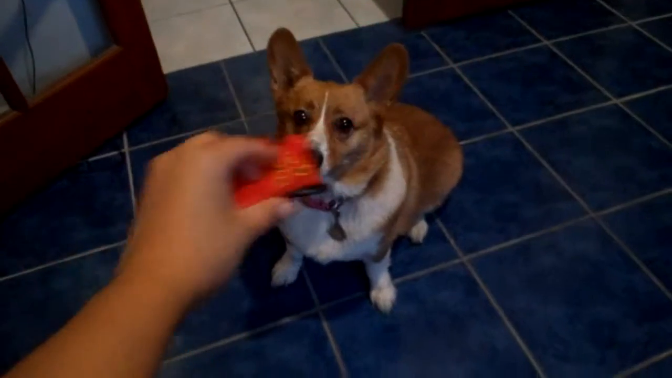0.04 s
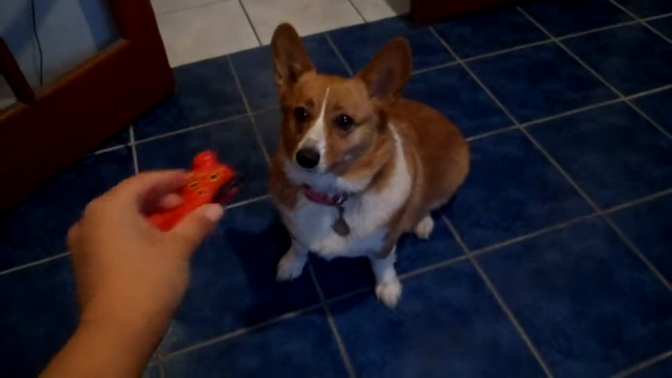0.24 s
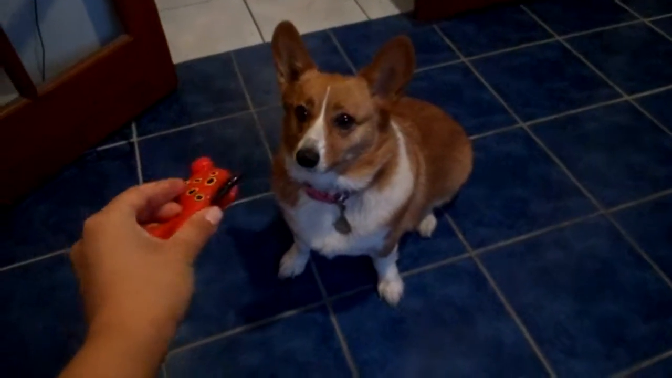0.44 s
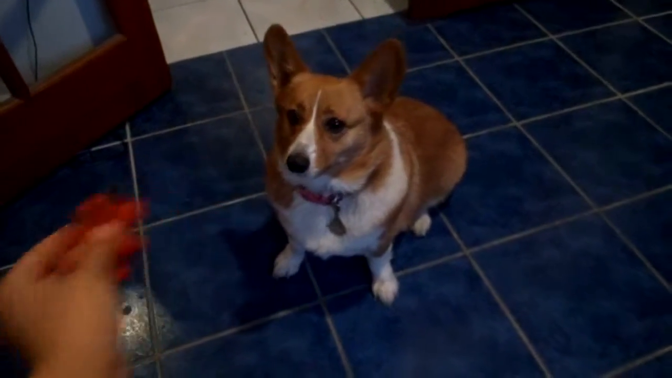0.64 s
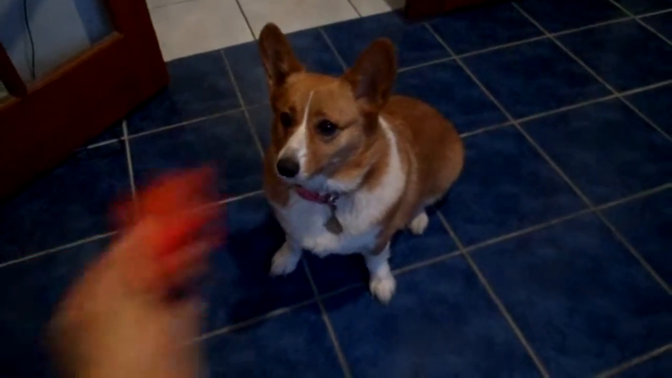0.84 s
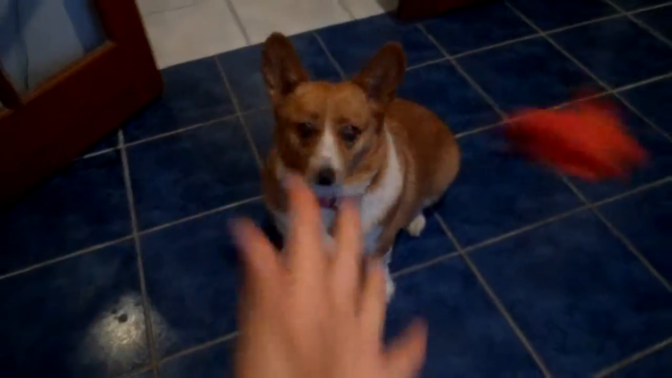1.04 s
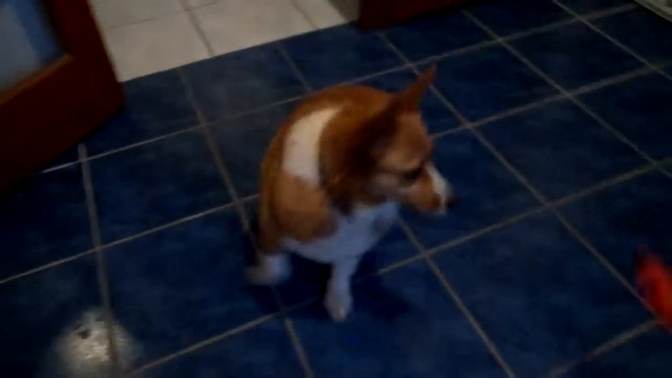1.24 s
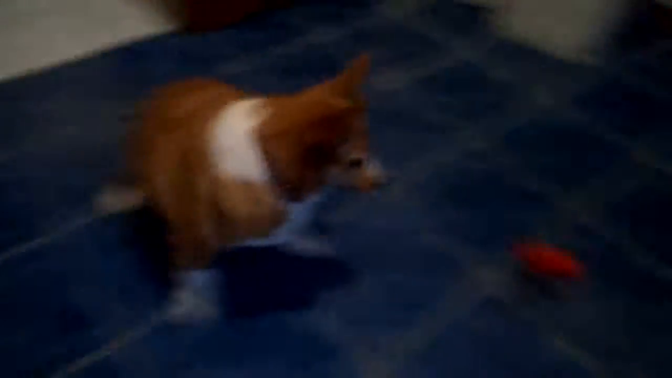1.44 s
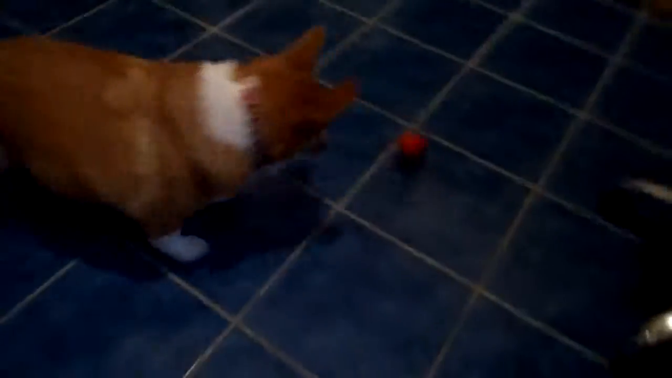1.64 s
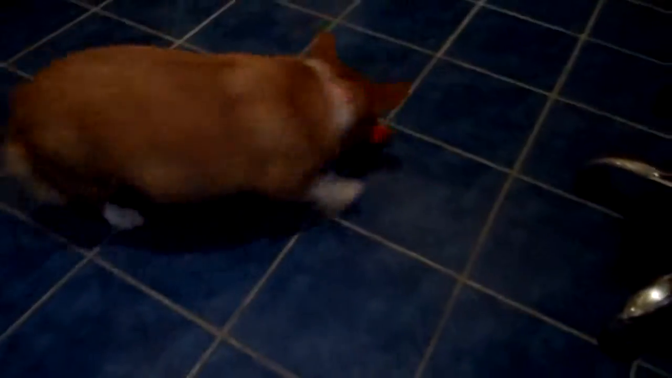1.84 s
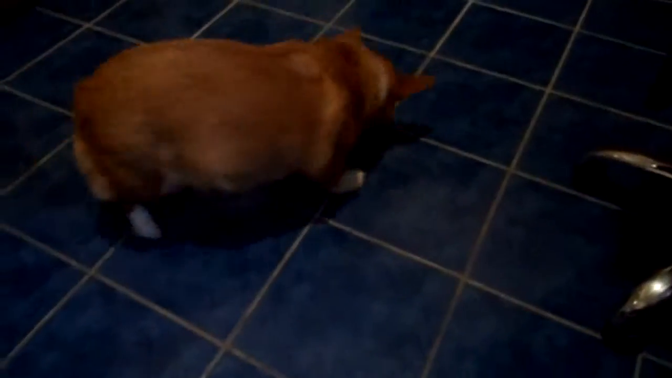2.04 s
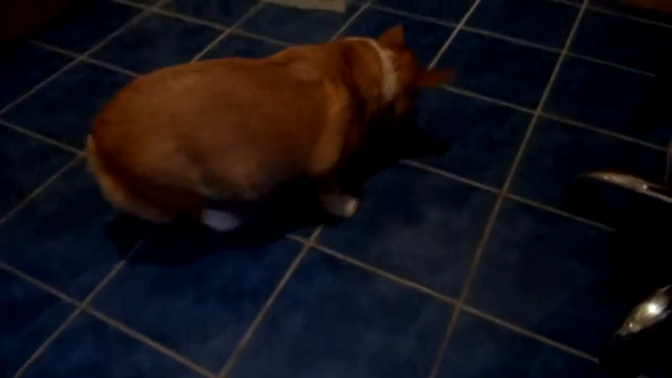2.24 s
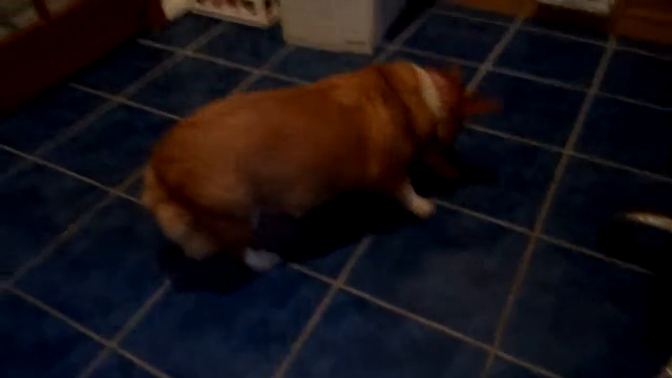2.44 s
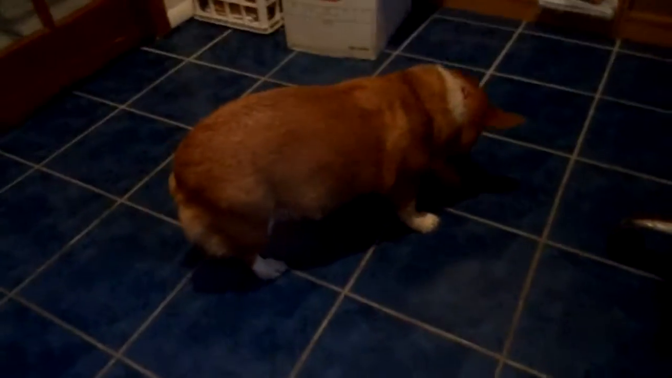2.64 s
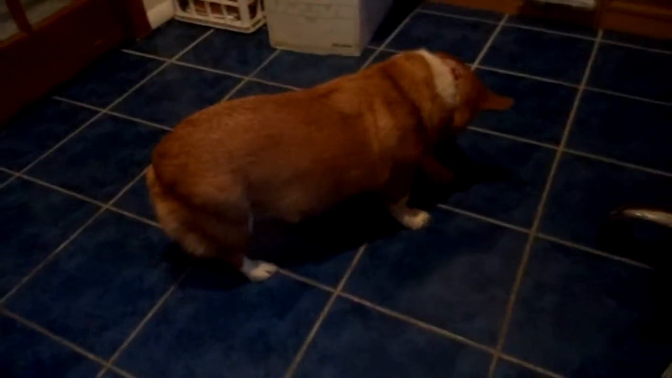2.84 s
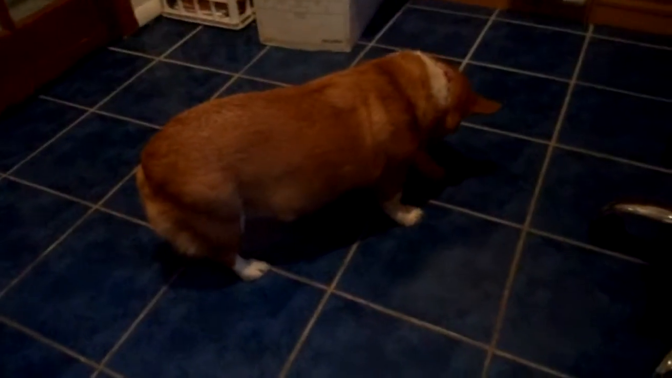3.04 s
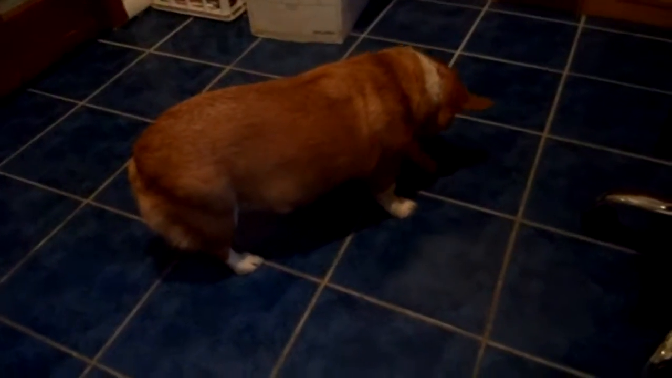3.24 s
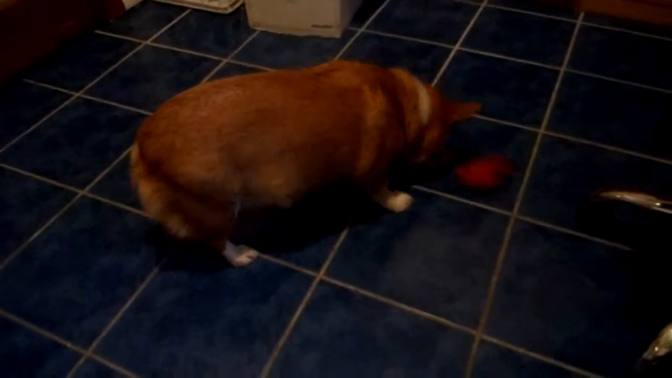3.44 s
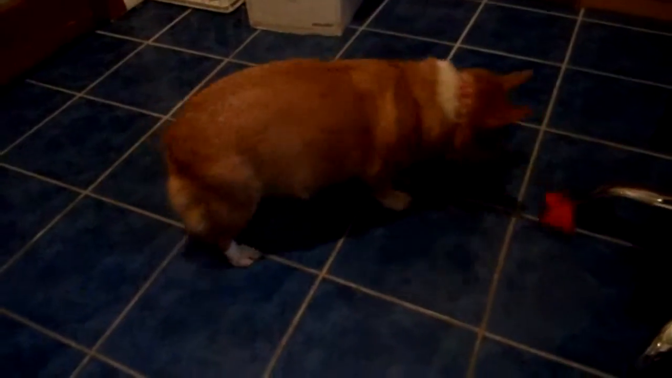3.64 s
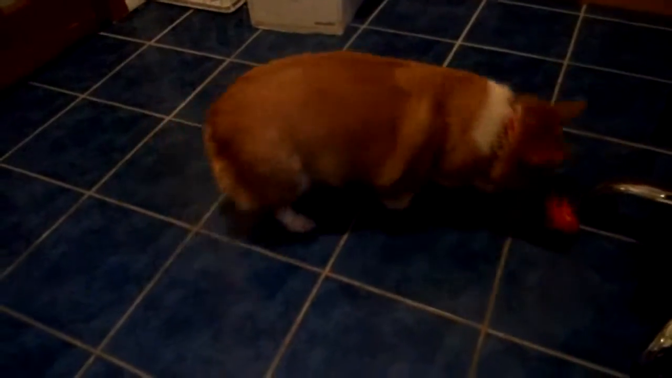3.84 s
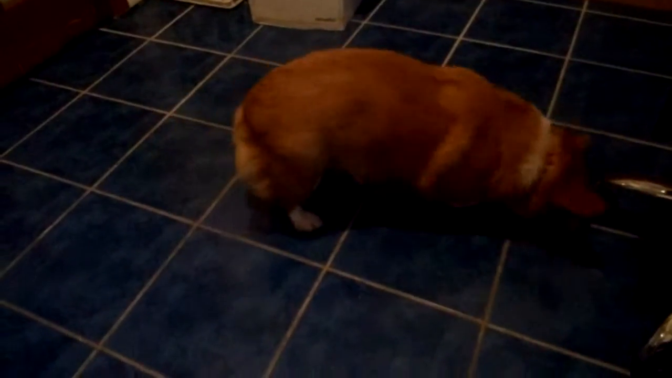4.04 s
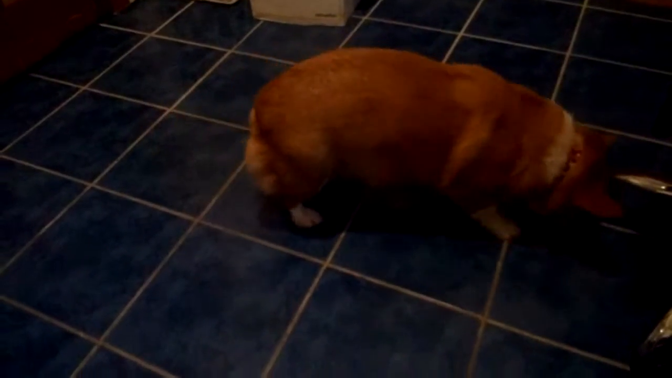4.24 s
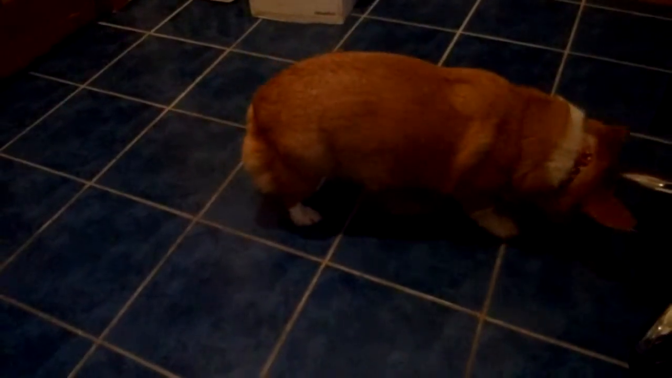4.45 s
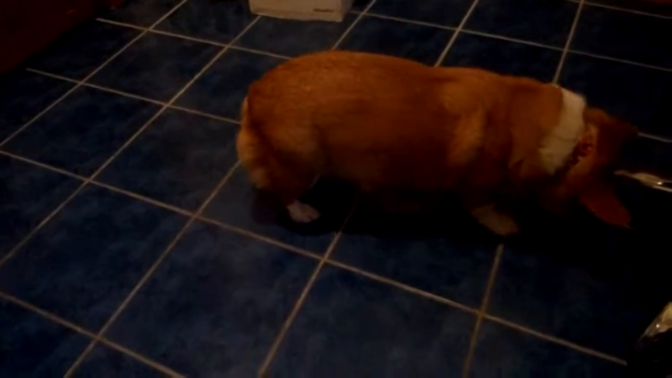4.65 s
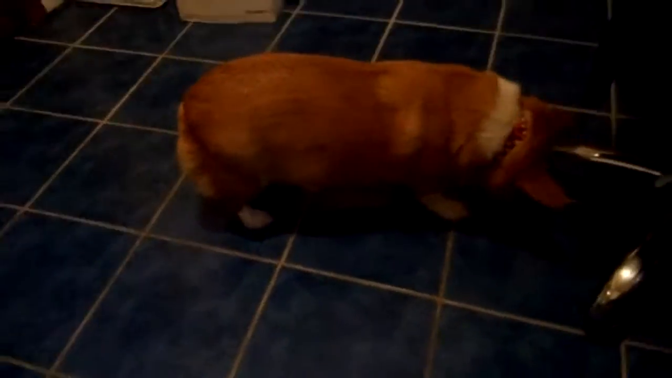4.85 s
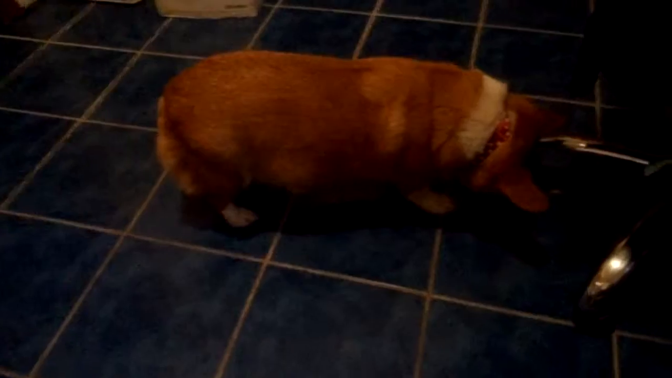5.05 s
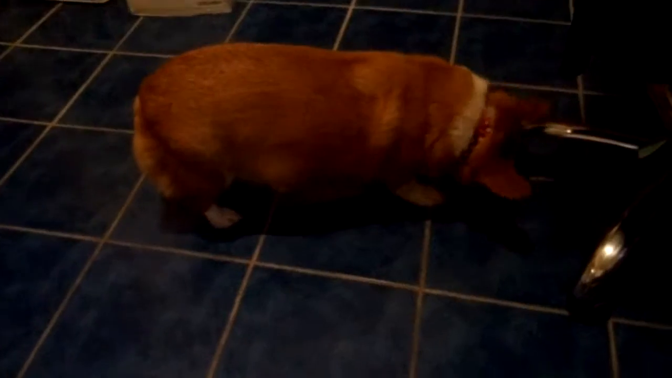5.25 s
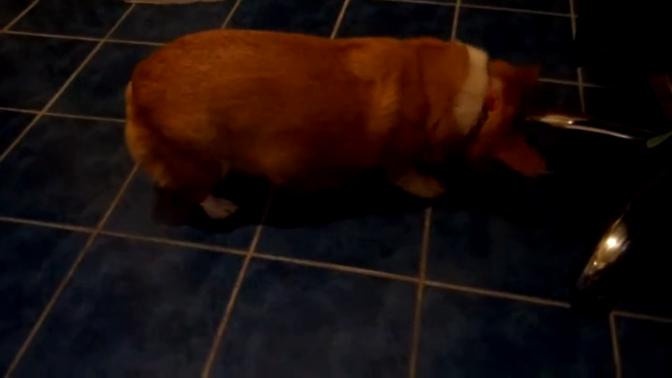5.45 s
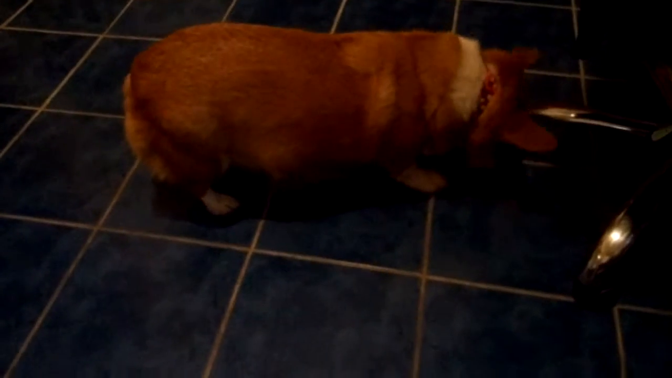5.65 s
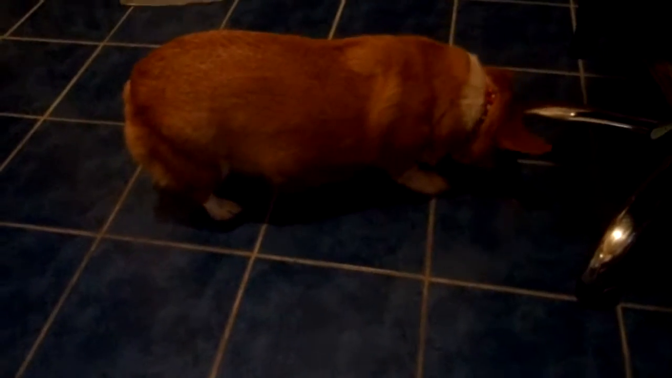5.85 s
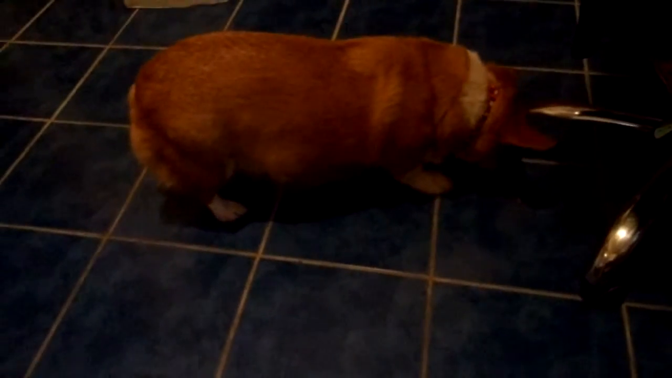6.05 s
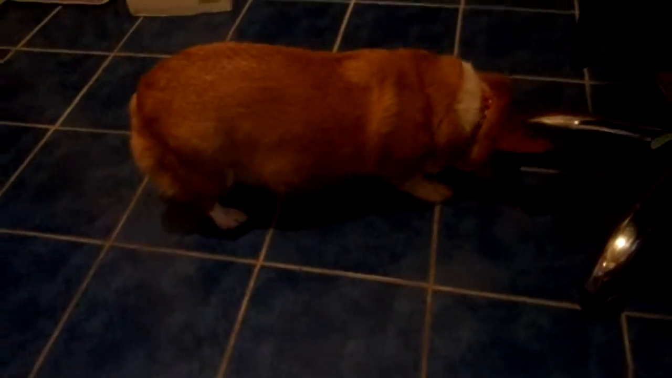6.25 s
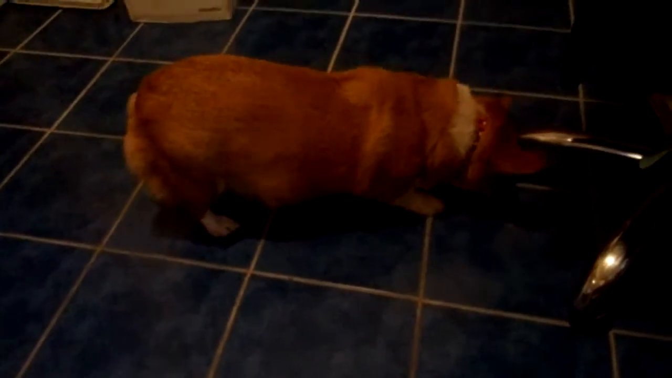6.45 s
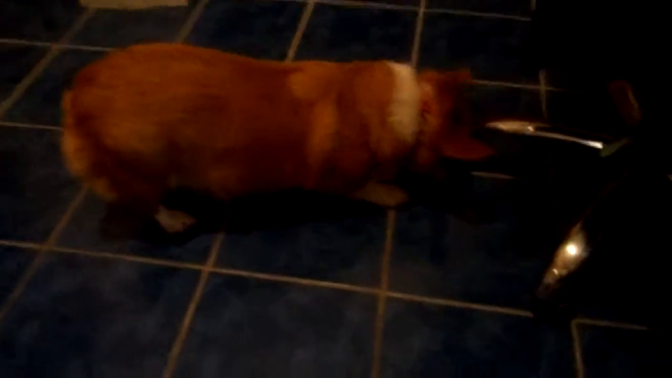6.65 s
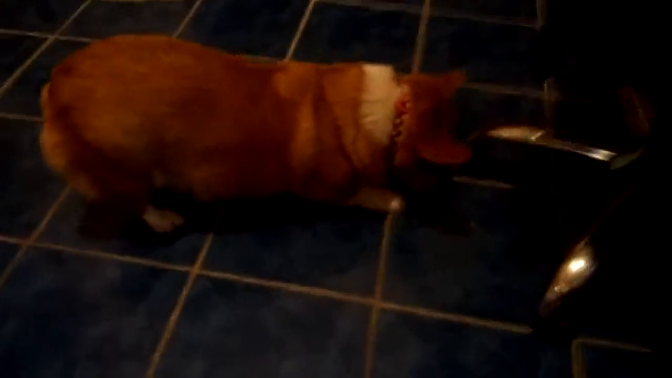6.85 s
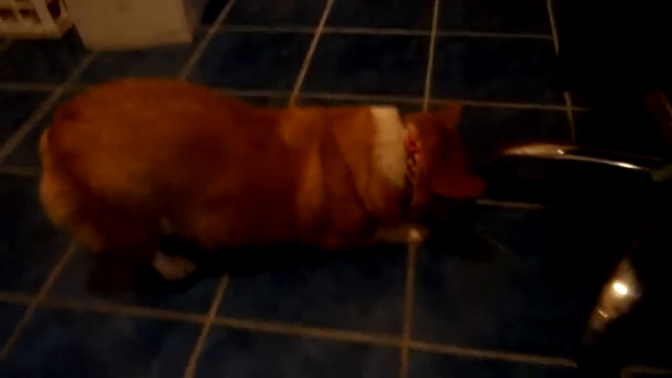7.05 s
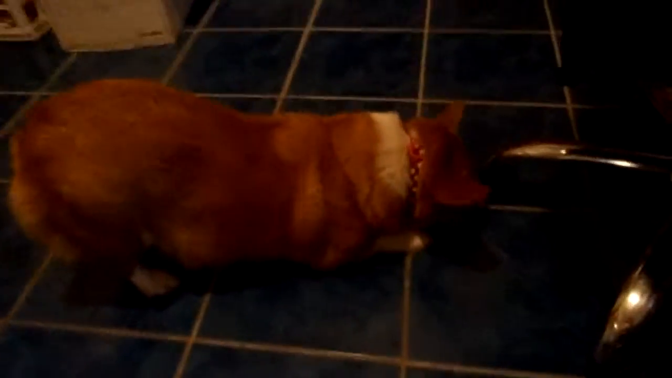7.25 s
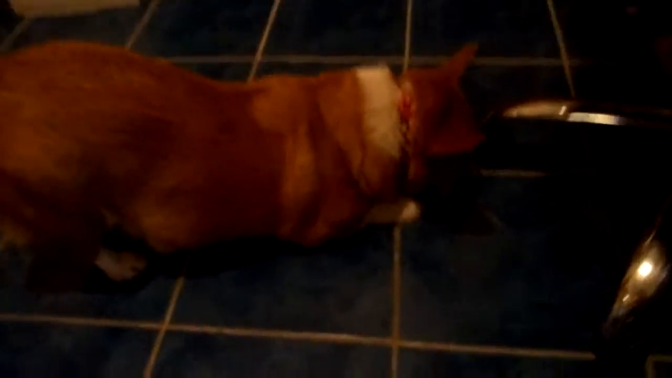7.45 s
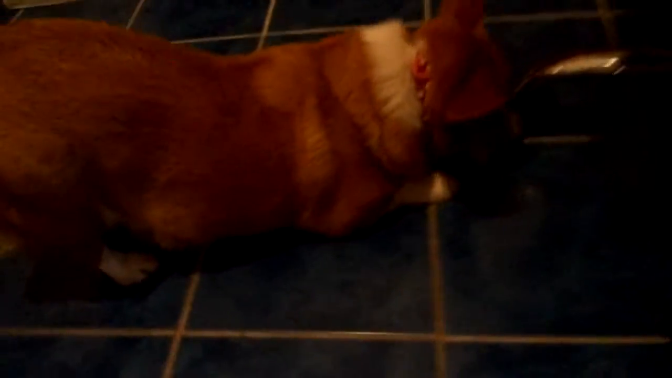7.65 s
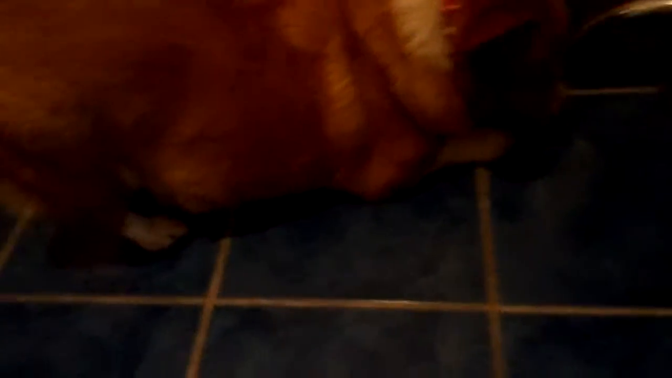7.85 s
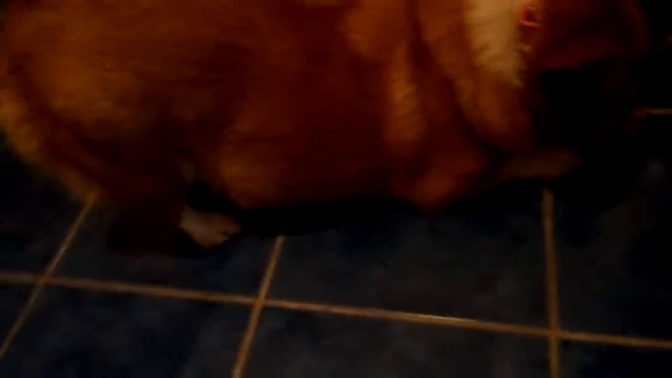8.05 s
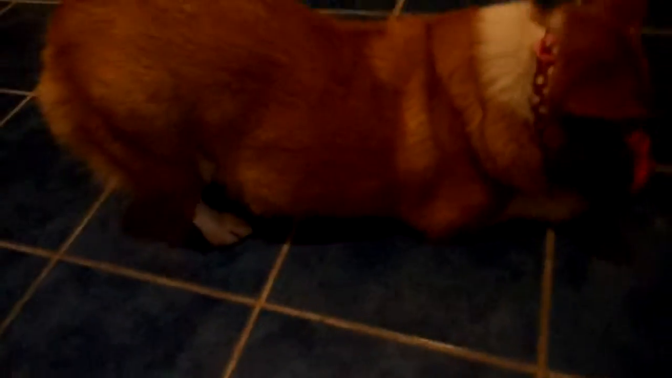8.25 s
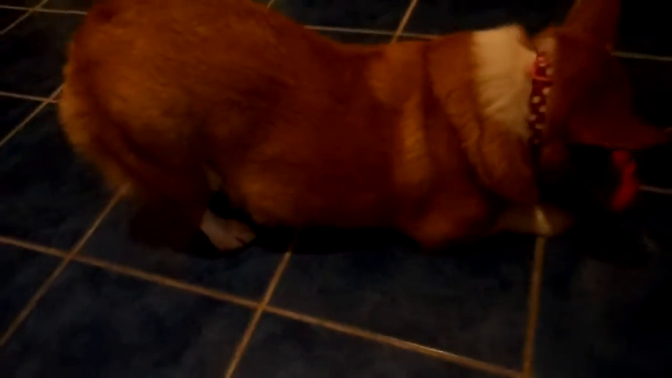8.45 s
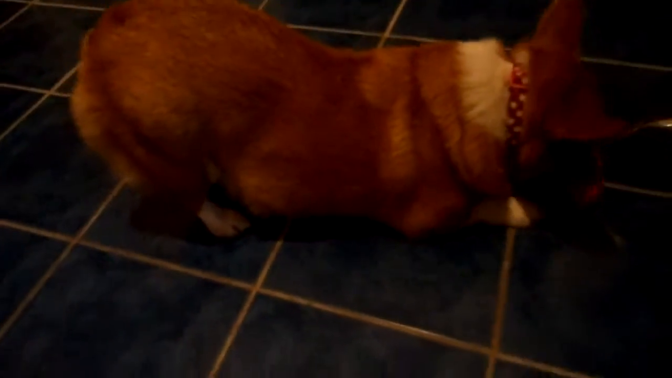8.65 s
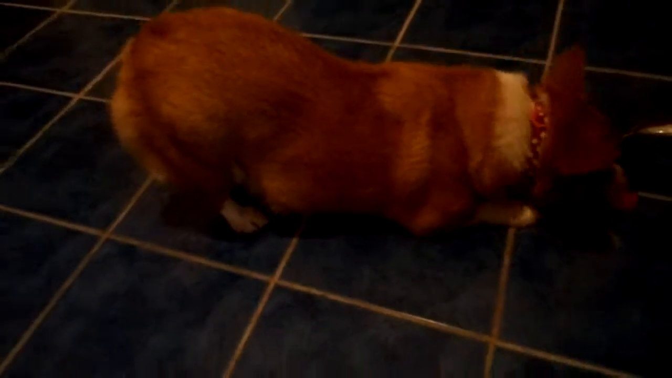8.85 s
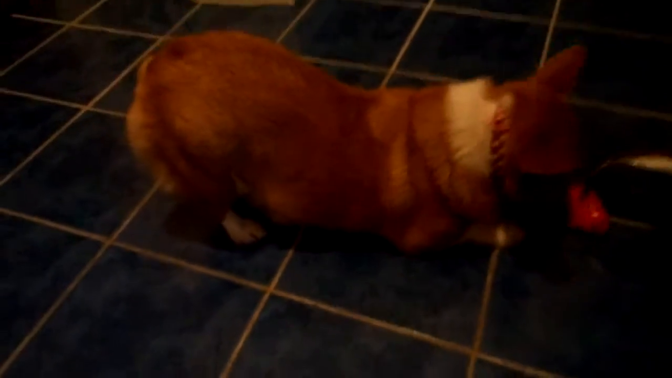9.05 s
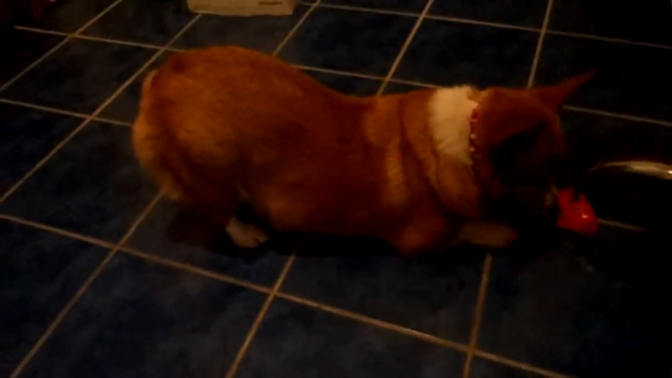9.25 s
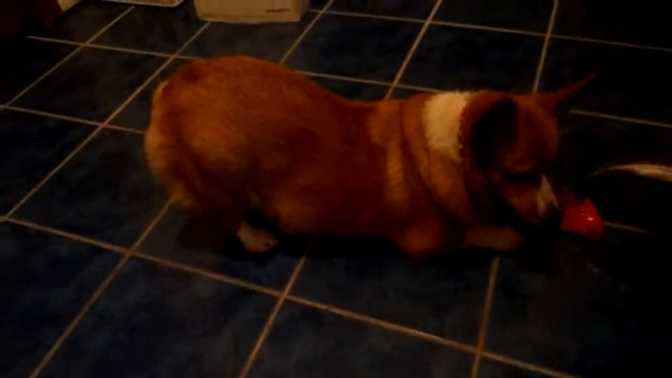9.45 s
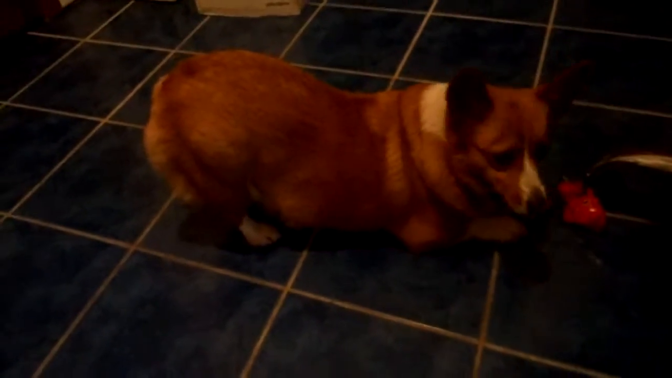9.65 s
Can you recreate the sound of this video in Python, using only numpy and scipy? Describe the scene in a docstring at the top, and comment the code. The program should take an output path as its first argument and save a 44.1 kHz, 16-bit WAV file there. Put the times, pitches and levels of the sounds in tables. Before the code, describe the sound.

A handheld stereo microphone near a dog on hard tile: quiet, then a toy landing, a flurry of sharp claw clicks and a bright tag ring. Claws, thumps and jingles return as the dog grabs the toy. Later comes a single abrupt, buzzy high squeak, faint hisses of squeezed air, a hollow snort, paw rubs and light thuds, all with short bright room reflections.

```python
"""A small, hard, tiled room indoors, on a two-port microphone: a dog chases, picks up and chews a rubber toy.
Claws, paws and toy meet the floor as short noise bursts; the collar tag jingles as a few decaying modes.
One hard bite drives the toy's reed as a sum of overtones; softer bites only press out puffs of shaped noise.
The dog huffs and snuffles as resonant noise, with one brief nose whistle.
Dense reflections answer the dog and toy; low rumble and faint hiss lie underneath."""
import sys
import numpy as np
from scipy import signal
from scipy.fft import rfft, irfft
from scipy.io import wavfile
from scipy.ndimage import uniform_filter1d

SR = 44100
rng = np.random.default_rng(int(sys.argv[2]) if len(sys.argv) > 2 else 0)


def store_wav(level_fs):
    """Save 16-bit WAV to argv[1]."""
    pcm = np.round(np.clip(np.atleast_2d(level_fs), -1, 1) * 32767)
    wavfile.write(sys.argv[1], SR, pcm.T.astype(np.int16))


N = 428451
HZ = np.fft.rfftfreq(N, 1 / SR)
EDGE_HZ = 14300  # upper band limit

# All table levels are relative: each source's own gain is added later.
# Rumble and hiss of the room: pitch_hz, level_db
ROOM_FLOOR_SPECTRUM = [(12, -21.5), (25, -4), (43, -9.5), (58, -6), (80, -15.5), (105, -8), (150, -16.5),
                       (236, -18.5), (270, -15.5), (310, -19), (468, -23.5), (615, -25.5), (1700, -34.5),
                       (3190, -35.5), (8790, -38), (14000, -37)]
# Likeness of the two microphone ports in the background: pitch_hz, likeness_0_to_1
FLOOR_LIKENESS = [(30, 0.88), (100, .75), (250, 0.52), (940, 0.37), (2350, 0.257), (14000, .03)]
# Rumble and hiss creep up in level, then stay
RUMBLE_START_DB, RUMBLE_CREEP_DB = -62, 5
HISS_START_DB, HISS_CREEP_DB, CREEP_S = -68.5, 6.5, 7.66

# Decay of the room's reflections: pitch_hz, t60_s
ROOM_DECAY = [(150, 0.26), (1000, 0.36), (3000, 0.33), (8000, 0.32), (14000, 0.24)]
# Likeness of the two microphone ports in the reflections: pitch_hz, likeness_0_to_1
ECHO_LIKENESS = [(100, 1), (1400, 1), (3000, 1), (5000, 0.98), (7000, 0.8), (10000, 0), (14000, 0)]

# Huff and snuffles of the dog: start_s, length_s, level_db
HUFF_EVENTS = [(7.43, 0.14, -56.5), (7.518, 0.26, -39.5), (9.005, 0.13, -53)]
# Breath through the muzzle: pitch_hz, level_db
MUZZLE_SPECTRUM = [(500, -26.5), (1000, -17.5), (1350, -12.5), (1700, -13), (2400, -8.5), (3100, -10),
                   (4000, -7.5), (5500, -12.5), (8500, -17), (11000, -16.5), (14000, -11)]
# The nose whistles near the height of the huff, its pitch settling from above
WHISTLE_START_S, WHISTLE_LENGTH_S = 7.6, 0.061
WHISTLE_HZ, WHISTLE_DROP_HZ, WHISTLE_SETTLE_S = 1510, 426, 0.021

# Paws shuffling on the tile: start_s, length_s, level_db
SHUFFLE_EVENTS = [(1.55, 0.17, -65), (2.525, 0.043, -59), (3.43, 0.099, -55), (7.31, 0.12, -56.5),
                  (8.74, .11, -58.5), (8.86, 0.086, -58), (9.03, 0.15, -58)]
# Rub of a paw: pitch_hz, level_db
SHUFFLE_SPECTRUM = [(150, -6), (350, 1), (750, -0.5), (1500, -6), (4000, -15.5), (14000, -15)]

# Toy and paws landing on the tiles: start_s, thump_db, slap_db, thump_pitch_hz
LANDINGS = [(1.4213, -39.5, -42.5, 148.7), (1.632, -61, -43, 400), (1.981, -50.5, -47.5, 252),
            (2.521, -60.5, -51, 250), (3.47, -47, -51, 175), (3.745, -53, -54, 162), (4.034, -66, -58, 400),
            (5.188, -51, -55.5, 332), (6.371, -50.5, -71, 276), (6.399, -45.5, -52, 180),
            (8.877, -49.5, -55, 396), (9.197, -55, -49.5, 294)]
# Broad push into the floor: pitch_hz, level_db
PUSH_SPECTRUM = [(40, -23.5), (110, -16), (180, -5.5), (300, -7.5), (550, -20.5), (1200, -19.5),
                 (5000, -59)]
# Slap of the surface: pitch_hz, level_db
SLAP_SPECTRUM = [(150, -25), (600, 8), (1300, 1), (2200, 1), (4000, -5), (7000, -9), (14000, -11)]
# A landing settles with a second, softer push and slap
SETTLE_DELAY_S, SETTLE_DB = .024, -9.5

# Claws and teeth ticking: start_s, level_db, low_part_relative_to_level_db
TICK_EVENTS = [(1.357, -28.5, -29), (1.4415, -34.5, -5.5), (1.479, -31, -10.5), (1.5395, -23, -20),
               (1.58, -31.5, -3.5), (1.6746, -28.5, -20.5), (1.855, -42, -9.5), (1.904, -32.5, -9.5),
               (3.4924, -26.5, -8), (3.5589, -28.5, -19), (3.6069, -28, -8.5), (3.697, -34.5, -6.5),
               (3.7744, -35.5, -22), (3.969, -41, -28), (4.3345, -31.5, -16.5), (4.9534, -46, -15),
               (6.9248, -41, -4), (8.1356, -46, 0), (9.2022, -41, -11)]
# Bright part of a tick: pitch_hz, level_db
TICK_HIGH_SPECTRUM = [(1000, -27), (4000, -12), (7000, -3.5), (10000, 1.5), (14000, 6)]
# Lower part of a tick: pitch_hz, level_db
TICK_LOW_SPECTRUM = [(400, -24), (1800, -13.5), (3500, -6), (6000, -9), (12000, -31.5)]
# A neighbouring claw or tooth touches just after each tick
NEXT_CLAW_DELAY_S, NEXT_CLAW_DB = .011, -13
# Faint ticks fall at random while the dog scrambles after the toy: start_s, end_s
SCRAMBLE_SPANS = [(1.45, 1.7), (3.5, 3.9)]
PATTER_PER_S, PATTER_DB = 12, -48.5

# Collar tag strikes: start_s, clash_db, face_ring_db, rim_ring_db
TAG_STRIKES = [(1.6146, -41, -48.5, -36), (1.9826, -22.5, -13.5, -33), (2.217, -56, -55, -65),
               (2.4097, -63, -64, -51.5), (2.5856, -43.5, -49.5, -34.5), (2.7228, -51, -57.5, -42),
               (3.484, -42, -38, -52), (3.5255, -58, -37.5, -45), (3.6141, -39, -39, -50.5),
               (3.7548, -44.5, -60, -43.5), (4.0353, -25.5, -30, -32), (4.0462, -49, -21.5, -42),
               (4.0618, -50, -24, -31), (4.12, -30, -34.5, -41), (4.2428, -46, -55, -48.5),
               (4.444, -46, -51.5, -42), (5.4997, -76, -77, -63), (6.349, -44.5, -48, -51),
               (6.38, -34, -38, -49), (6.6427, -43, -62, -43), (6.747, -41.5, -55, -38),
               (6.988, -34, -32.5, -43.5), (8.5964, -69, -73, -61), (8.706, -60, -53.5, -71)]
# Modes of the tag: pitch_hz, level_db, t60_s, share_following_rim_not_face_0_to_1
TAG_RING_MODES = [(5150, -24, 0.29, 0.09), (5773, -16, 0.27, 0.3), (8630, 2, 0.1074, 0.06),
                  (11420, -3, 0.16, 0.4), (12200, 6, .14, 0.95)]
# Knock of tag on ring: pitch_hz, level_db
CLASH_SPECTRUM = [(300, -34), (1200, -21), (2500, -9.5), (4500, -6.5), (7000, -1), (9000, 0), (11000, -1.5),
                  (14000, 7.5)]
# After each strike the tag swings back and rings again, more softly
REBOUND_DELAY_S, REBOUND_DB = .033, -13.5

# Puffs through the toy's nozzle: start_s, length_s, level_db, hiss_centre_hz
NOZZLE_PUFFS = [(1.175, 0.098, -59.5, 12000), (2.232, 0.051, -52, 8000), (2.315, 0.046, -49.5, 10240),
                (2.38, 0.065, -55, 13000), (6.315, 0.062, -52, 10200), (6.348, 0.1, -42, 12600),
                (6.525, .24, -50, 13400), (7.238, 0.12, -48, 12000), (8.855, 0.072, -38.5, 10390),
                (8.922, 0.18, -54.5, 11000), (9.021, 0.12, -54.5, 12200)]
# Broad hiss of the nozzle: pitch_hz, level_db
NOZZLE_SPECTRUM = [(500, -14), (3000, -12.5), (5000, -13), (7500, -9.5), (9800, 1), (11500, -6), (14000, 4)]

# Overtones of the reed: multiple_of_pitch, level_db
REED_OVERTONES = [(1, 1.5), (2, -5.5), (3, 3), (4, -1.5), (5, -3), (6, -1), (7, 3.5), (8, 4.5), (9, 0),
                  (10, -1), (11, 3.5), (12, -1), (13, 6), (14, -4.5), (15, -25)]
# Air escaping past the reed: pitch_hz, level_db
REED_AIR_SPECTRUM = [(800, -42), (3000, -18), (4500, -9), (6000, -6), (7600, -3), (9500, -7), (11000, -13),
                     (14000, 3)]
# The hard bite: the reed starts at once, holds while the air lasts, then fades
BITE_S, REED_DB = 6.4046, -21.5
REED_ATTACK_S, REED_HOLD_S, REED_RELEASE_S = 0.00092, 0.051, 0.029
REED_FADE_DB_PER_S = 607
# Its pitch follows the pressure in the toy along one arch, highest CREST_S after the bite
REED_TOP_HZ, CREST_S, SAG_HZ_PER_S2 = 994.5, .0185, 48000
# The reed spits air as it starts, and grows breathier as its pitch sags
SPIT_S, BREATHY_DB, BREATHY_DB_PER_HZ = 0.0057, -27, .13


def amp(db):
    """Decibels to gain."""
    return 10 ** (np.asarray(db) / 20)


def unit(x):
    """Scales to rms 1."""
    return x / np.sqrt(np.mean(x ** 2) + 1e-20)


def read(points, hz):
    """Reads a spectrum on a log-frequency axis."""
    f, value = np.transpose(points)
    return np.interp(np.log(hz + 1), np.log(f + 1), value)


def add(mix, s, sound):
    """Adds a sound at time s."""
    part = mix[max(round(s * SR), 0):][:len(sound)]
    part += sound[:len(part)]


def noise(spectrum):
    """Noise of rms 1 with the given spectrum, cut above the band limit."""
    white = rfft(rng.standard_normal(N))
    return unit(irfft(white * amp(read(spectrum, HZ)) * (HZ < EDGE_HZ), N))


def resonant_noise(hz, width_hz, size=N):
    """Noise of rms 1 ringing in one resonance, which may move."""
    turn = np.exp(2j * np.pi * np.cumsum(hz * np.ones(size)) / SR)
    r = np.exp(-np.pi * width_hz / SR)
    # shift the resonance down to 0 Hz, filter there, shift back up
    ringing = turn * signal.lfilter([1], [1, -2 * r, r * r], rng.standard_normal(size) / turn)
    return unit(ringing.real)


def bursts(times, levels_db, spectrum, decay):
    """Each contact is a burst of noise with a quick onset and an exponential decay (time constant in s)."""
    t, envelope = np.arange(SR // 5) / SR, np.zeros(N)
    for s, db in zip(times, levels_db):
        add(envelope, s, amp(db) * np.exp(-t / decay) * (1 - np.exp(-6 * t / decay)))
    return envelope * noise(spectrum)


def swell(start, length, skew=0.92, power=1.):
    """One smooth rise and fall of height 1; a skew under 1 brings the peak forward."""
    envelope, progress = np.zeros(N), np.linspace(0, 1, round(length * SR))
    add(envelope, start, abs(np.sin(np.pi * progress ** skew)) ** power)
    return envelope


def airflow(events, air, gain_db, flutter_db, skew, power):
    """A rushing noise that swells once for each event and flutters."""
    envelope = sum(amp(db) * swell(start, length, skew, power) for start, length, db, *_ in events)
    flutter = unit(uniform_filter1d(rng.standard_normal(N), size=250))
    return envelope * amp(gain_db + flutter_db * flutter) * air


def ports(a, b, likeness):
    """Two unrelated signals become a left-right pair of the given likeness."""
    same = np.clip(read(likeness, HZ), 0, 1)
    mid = rfft(a, N) * np.sqrt((1 + same) / 2)
    side = rfft(b, N) * np.sqrt((1 - same) / 2)
    return irfft(np.array([mid + side, mid - side]), N)


def background(split_hz=700):
    """Low room rumble under a faint hiss, split from one stereo noise and creeping up separately."""
    creep = np.minimum(np.arange(N) / SR / CREEP_S, 1)
    floor = rfft(ports(noise(ROOM_FLOOR_SPECTRUM), noise(ROOM_FLOOR_SPECTRUM), FLOOR_LIKENESS))
    low_share = 1 / (1 + (HZ / split_hz) ** 4)
    rumble = unit(irfft(floor * low_share, N))
    hiss = unit(irfft(floor * (1 - low_share), N))
    rumble_gain = amp(RUMBLE_START_DB + RUMBLE_CREEP_DB * creep)
    return rumble * rumble_gain + hiss * amp(HISS_START_DB + HISS_CREEP_DB * creep)


def room_tail(build=0.0032):
    """Dense reflections off tile and cupboards, each band dying at its own speed (build-up time in s)."""
    size = SR * 3 // 4
    taps = rng.standard_normal(size) * (rng.random(size) < .2)
    hz, t, bands = signal.stft(taps, SR, nperseg=256)
    decay = amp(-60 * t / read(ROOM_DECAY, hz)[:, None])
    tail = signal.istft(bands * decay, SR, nperseg=256)[1]
    tail *= 1 - np.exp(-(np.arange(len(tail)) / SR / build) ** 2)
    return tail / np.linalg.norm(tail)


def placed(x, wet_db, left_db, lag=1.2e-5):
    """Direct sound, leaning left in the treble and reaching the left port lag seconds later, plus the room."""
    side = np.array([[1], [-1]])
    lean = amp(side * left_db * (HZ / EDGE_HZ) ** 2)  # left_db up on the left, down on the right
    direct = lean * np.exp(-1j * np.pi * side * HZ * lag)
    echo = ports(room_tail(), room_tail(), ECHO_LIKENESS)[:, :SR * 3 // 4]
    wet = signal.oaconvolve(x[None], echo, axes=1)[:, :N]
    return irfft(rfft(x) * direct, N) + amp(wet_db) * wet


def huff_air(nose_hz=2350, width_hz=400, focus=0.27):
    """The dog blows through its nose, which rings with one hollow resonance."""
    return unit(noise(MUZZLE_SPECTRUM) + focus * resonant_noise(nose_hz, width_hz))


def huff_whistle(gain_db=-41, width_hz=150):
    """The air in the dog's nose briefly locks into a fuzzy tone."""
    age = np.maximum(np.arange(N) / SR - WHISTLE_START_S, 0)
    hz = WHISTLE_HZ + WHISTLE_DROP_HZ * np.exp(-age / WHISTLE_SETTLE_S)
    envelope = swell(WHISTLE_START_S, WHISTLE_LENGTH_S, power=0.89)
    return amp(gain_db) * envelope * resonant_noise(hz, width_hz)


def shuffles():
    """Paws rub over the tile as fluttering swells of dull noise."""
    return airflow(SHUFFLE_EVENTS, noise(SHUFFLE_SPECTRUM), gain_db=-4, flutter_db=2.5, skew=0.72, power=1.1)


def thuds(thump_db=0, slap_db=4, push_db=-6, decay=0.017, damping=0.66):
    """Soft rubber or a paw meets the floor: a slap, a dull pitched thump and a broad push."""
    s, thump, slap, _ = np.transpose(LANDINGS)
    s = np.r_[s, s + SETTLE_DELAY_S]
    thump, slap = np.r_[thump, thump + SETTLE_DB], np.r_[slap, slap + SETTLE_DB]
    out = bursts(s, thump + push_db, PUSH_SPECTRUM, decay=0.019)
    out += bursts(s, slap + slap_db, SLAP_SPECTRUM, decay=0.0049)
    t = np.arange(SR // 5) / SR
    for start, db, _, hz in LANDINGS:
        body = resonant_noise(hz, damping * hz, size=len(t))
        add(out, start, amp(db + thump_db) * np.exp(-t / decay) * body)
    return out


def patter(scatter_db=3):
    """Light claw touches at random times and levels between the firm steps."""
    s = np.concatenate([rng.uniform(start, end, round(PATTER_PER_S * (end - start)))
                        for start, end in SCRAMBLE_SPANS])
    levels_db = PATTER_DB + scatter_db * rng.standard_normal(len(s))
    return bursts(s, levels_db, TICK_HIGH_SPECTRUM, decay=.0015)


def claws(high_db=-1, low_db=-4):
    """Very short, bright ticks of claws and teeth, each followed by a lighter one."""
    s, db, low = np.transpose(TICK_EVENTS)
    s, db = np.r_[s, s + NEXT_CLAW_DELAY_S], np.r_[db, db + NEXT_CLAW_DB]
    low = np.r_[low, low]
    bright = bursts(s, db + high_db, TICK_HIGH_SPECTRUM, decay=.0015)
    return bright + bursts(s, db + low + low_db, TICK_LOW_SPECTRUM, decay=0.0022)


def tag_clash(clash_db=7, chatter_db=-9):
    """The tag knocks against its ring and chatters briefly."""
    s, db = np.transpose(TAG_STRIKES)[:2]
    knock = bursts(s, db + clash_db, CLASH_SPECTRUM, decay=0.00066)
    return knock + bursts(s, db + chatter_db, CLASH_SPECTRUM, decay=.012)


def tag_ring(ring_db=3, scatter_db=1, swing_hz=30, swing=.5, firm_db=-30, brighten=.4):
    """A small metal disc: blows on its face ring the middle mode, blows on its rim the highest."""
    t, out = np.arange(SR // 2) / SR, np.zeros(N)
    middle_hz = TAG_RING_MODES[2][0]
    for s, _, face_db, rim_db in TAG_STRIKES:
        firmness_db = max(face_db, rim_db) - firm_db
        for delay, blow_db in (0, 0), (REBOUND_DELAY_S, REBOUND_DB):
            for hz, db, t60, rim in TAG_RING_MODES:
                level_db = ring_db + blow_db + db + face_db + rim * (rim_db - face_db)
                level_db += scatter_db * rng.standard_normal()
                # a harder blow is brighter: the two low modes grow less than the rest
                level_db += brighten * firmness_db * min(np.log2(hz / middle_hz), 0)
                # the blow sets the tag twirling, so each mode beams away from the microphone and back
                twirl = 1 - swing * np.sin(np.pi * swing_hz * rng.uniform(.5, 1.0) * t) ** 2
                envelope = amp(level_db - 60 * t / t60) * (1 - np.exp(-t / 0.00029)) * twirl
                add(out, s + delay, envelope * np.sin(2 * np.pi * (hz * t + rng.random())))
    return out


def nozzle_hiss(width_hz=2200, focus=0.97, glide=0.073):
    """Broad hiss with a resonance that climbs through each puff as the teeth pinch the nozzle."""
    t = np.arange(N) / SR
    start, length, _, hz = np.transpose(NOZZLE_PUFFS)
    puff = np.maximum(np.searchsorted(start, t) - 1, 0)  # the latest puff to have started
    progress = np.clip((t - start[puff]) / length[puff], 0, 1)
    centre_hz = hz[puff] * (1 + glide * (progress - .5))
    return unit(noise(NOZZLE_SPECTRUM) + focus * resonant_noise(centre_hz, width_hz))


def squeak(jitter=0.0046, spread=0.027):
    """The reed chops the air nearly a thousand times a second; as the pressure runs out it sags to hiss."""
    t = np.arange(0, REED_HOLD_S + REED_RELEASE_S, 1 / SR)
    sag_hz = SAG_HZ_PER_S2 * (t - CREST_S) ** 2
    fade_db = REED_FADE_DB_PER_S * np.maximum(t - REED_HOLD_S, 0)
    envelope = (1 - np.exp(-t / REED_ATTACK_S)) * amp(REED_DB - fade_db)
    airy = np.minimum(amp(BREATHY_DB + BREATHY_DB_PER_HZ * sag_hz) + np.exp(-t / SPIT_S), 1)
    waver = unit(uniform_filter1d(rng.standard_normal(N), size=40))[:len(t)]
    # an airier reed wavers more in pitch
    turns = np.cumsum((REED_TOP_HZ - sag_hz) * (1 + jitter * (1 + 2 * airy) * waver)) / SR
    reed = np.zeros(len(t))
    for k, (_, level_db) in enumerate(REED_OVERTONES, 1):
        # a slack reed loses the higher overtones first
        strength = amp(level_db) / np.hypot(1, airy * k / 10)
        # the nozzle delays the higher overtones, which smears each pulse
        reed -= strength * np.cos(2 * np.pi * (k * turns - spread * k ** 2))
    # the escaping air pulses with the reed
    air = noise(REED_AIR_SPECTRUM)[:len(t)] * (1 + np.cos(2 * np.pi * turns))
    out = np.zeros(N)
    add(out, BITE_S, envelope * (unit(reed) + airy * unit(air)))
    return out


def scene():
    """Room, dog and toy, each source placed before the two ports."""
    breath = airflow(HUFF_EVENTS, huff_air(), gain_db=-3.0, flutter_db=2.0, skew=0.81, power=1.74)
    huffs = placed(breath + huff_whistle(), wet_db=-1.5, left_db=0.5)
    floor = placed(thuds() + shuffles(), wet_db=-3.0, left_db=3.0)
    floor += placed(claws() + patter(), wet_db=-0.5, left_db=1.0)
    collar = placed(tag_ring(), wet_db=-2.5, left_db=2.5)
    collar += placed(tag_clash(), wet_db=1.5, left_db=0.5)
    puffs = airflow(NOZZLE_PUFFS, nozzle_hiss(), gain_db=-1.5, flutter_db=2.5, skew=0.79, power=1.23)
    toy = placed(puffs, wet_db=-1.5, left_db=1)
    toy += placed(squeak(), wet_db=-4, left_db=5.5, lag=1.9e-5)
    return background() + huffs + floor + collar + toy


def record(dry):
    """The recorder's band limit: a steep low-pass."""
    edge = signal.firwin(401, EDGE_HZ, window=("kaiser", 7), fs=SR)
    return signal.oaconvolve(dry, edge[None], "same", axes=1)


dry = scene()
out = record(dry)
store_wav(out)
```